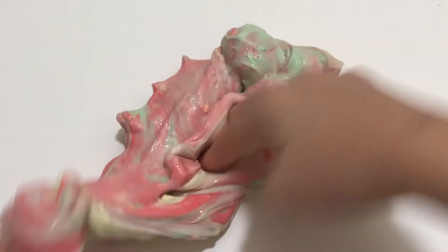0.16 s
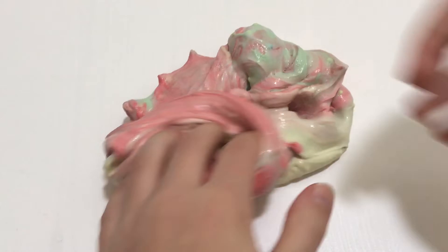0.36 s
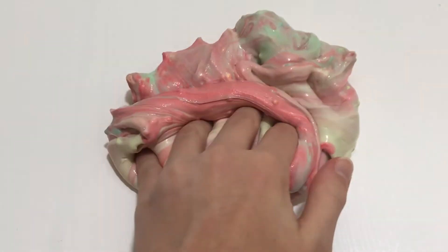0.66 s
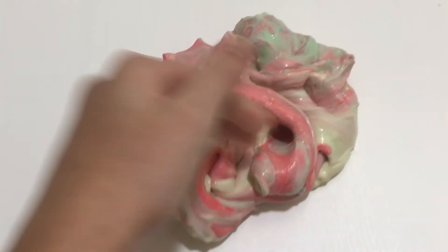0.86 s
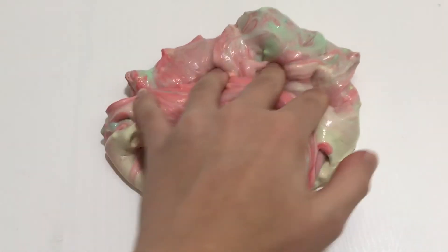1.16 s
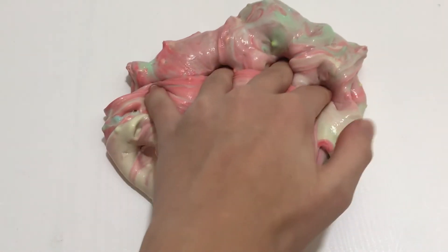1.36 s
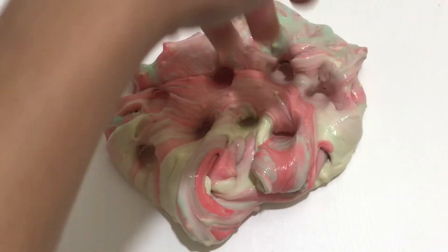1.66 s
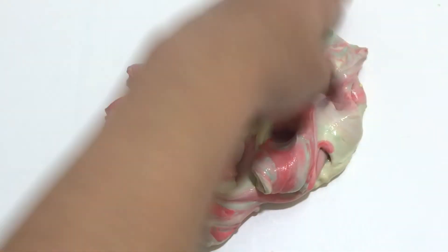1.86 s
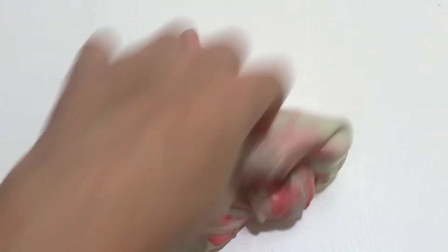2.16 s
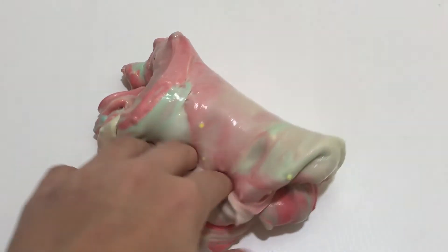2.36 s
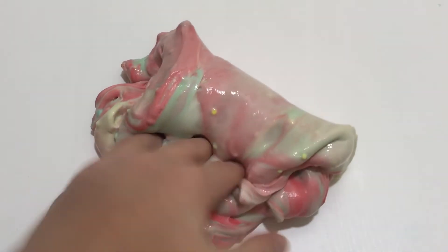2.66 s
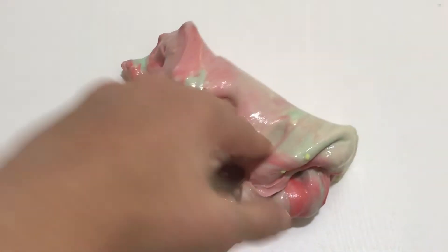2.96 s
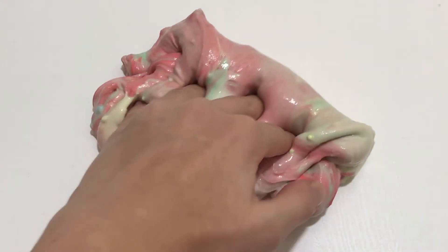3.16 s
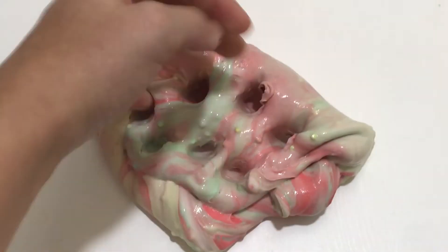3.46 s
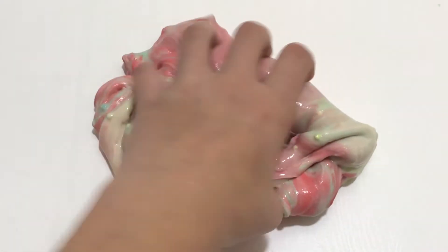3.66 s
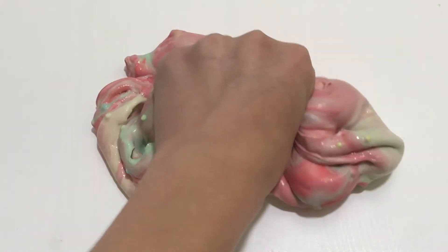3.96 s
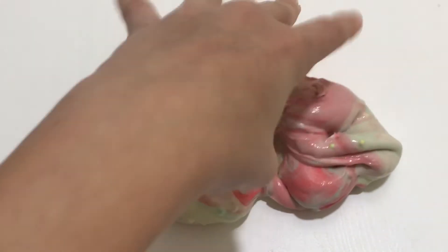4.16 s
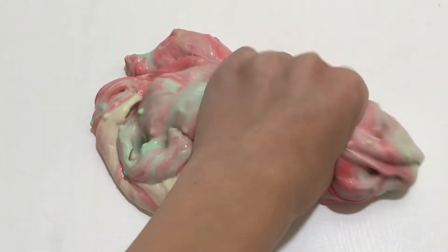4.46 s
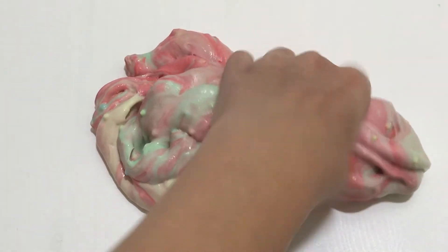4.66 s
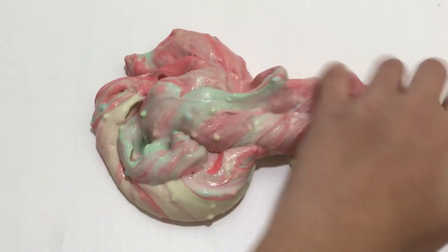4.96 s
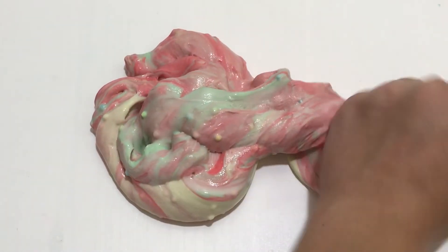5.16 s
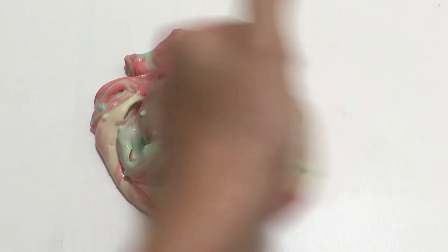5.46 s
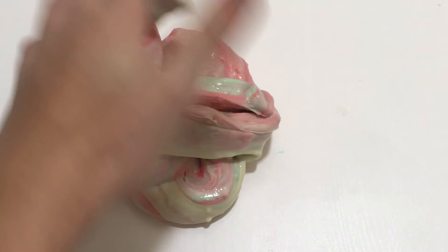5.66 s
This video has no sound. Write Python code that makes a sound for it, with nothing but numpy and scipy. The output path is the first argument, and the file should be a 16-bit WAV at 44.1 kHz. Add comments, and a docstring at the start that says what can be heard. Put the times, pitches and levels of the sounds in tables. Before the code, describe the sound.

Hands knead sticky slime on a table, with sharp air-pocket pops, wet crackling peels and soft low thumps in a small room.

```python
"""In a small room, close to a phone microphone, hands knead a lump of slime on a table.
Trapped air pockets burst as short damped swings; the sticky skin peels as many tiny random bursts.
Finger presses ring the low modes of the table top, quick slaps of the lump its higher modes.
Under it lie an unsteady low rumble, as filtered noise, and a hiss whose level steps up and down."""
import sys
import numpy as np
from scipy import signal
from scipy.fft import rfft, irfft, next_fast_len
from scipy.io import wavfile
from scipy.ndimage import uniform_filter1d, map_coordinates

SR = 44100
rng = np.random.default_rng(int(sys.argv[2]) if len(sys.argv) > 2 else 0)


def put_to_file(sound):
    """Save the sound as 16-bit audio at rate SR, in the file named by the first command-line argument."""
    columns = np.atleast_2d(sound).T  # one column per channel
    safe = np.clip(columns, -1, 1)
    whole_steps = np.round(safe * 32767)
    wavfile.write(sys.argv[1], SR, whole_steps.astype(np.int16))


N = 257103


def amp(db):
    """Level: an amplitude ratio is 10 to the power dB / 20."""
    return 10 ** (np.asarray(db) / 20)


def unit(x):
    """Normalisation: the root mean square becomes 1."""
    return x / np.sqrt(np.mean(x ** 2) + 1e-20)


def along(points, hz):
    """Logarithmic frequency scale: interpolates (f/Hz, value) points along it."""
    f, value = np.transpose(points)
    return np.interp(np.log(hz + 1), np.log(f + 1), value)


def filtered(x, response):
    """Linear filtering: the spectrum of x times a complex response of frequency."""
    size = next_fast_len(len(x) + SR // 2)
    spectrum = rfft(x, size) * response(np.fft.rfftfreq(size, 1 / SR))
    return irfft(spectrum, size)[:len(x)]


def coloured(x, spectrum):
    """Spectral shaping: x filtered by (f/Hz, gain/dB) points, then brought to unit power."""
    return unit(filtered(x, lambda hz: amp(along(spectrum, hz))))


def add(track, sound, s):
    """Superposition: mixes sound into track at s seconds."""
    part = track[round(s * SR):][:len(sound)]
    part += sound[:len(part)]


def blip(hz, cycles, size=SR // 40):
    """Damped oscillation: an air spring swings a few cycles and moves no net air; peak 1."""
    turns = np.arange(size) / SR * hz
    swell = turns * np.exp(-turns / cycles)
    swing = swell * np.sin(2 * np.pi * turns)
    # subtracting a share of the swell brings the sum to zero
    swing -= swell * swing.sum(axis=-1, keepdims=True) / swell.sum(axis=-1, keepdims=True)
    return swing / np.max(np.abs(swing), axis=-1, keepdims=True)


def modes(table):
    """Modal superposition: causal response of (f/Hz, width/Hz, level/dB) resonances."""
    def response(f):
        return sum(amp(db) * 1j * f * width / (centre * centre - f * f + 1j * f * width)
                   for centre, width, db in table)
    return response


# reverberation time of the room: f/Hz, t60/s
REVERBERATION_TIME = [(150, .35), (500, 0.19), (1200, 0.33), (3000, 0.2), (7000, 0.28), (15000, 0.14)]
# relative colour of the wall reflections: f/Hz, level/dB
WALL_COLOUR = [(200, -3), (800, -2), (2500, -2.5), (6000, -7.5), (16000, -3.5)]


def room_tail():
    """Reverberation: a fresh diffuse tail of energy 1; each frequency decays at its own rate."""
    hz, t, noise = signal.stft(rng.standard_normal(SR // 2), SR, nperseg=256)
    colour_db = along(WALL_COLOUR, hz)[:, None]
    decay_db = -60 * t / along(REVERBERATION_TIME, hz)[:, None]
    tail = signal.istft(noise * amp(colour_db + decay_db), SR, nperseg=256)[1]
    tail *= 1 - np.exp(-np.arange(len(tail)) / SR / 0.00055)  # the walls take a moment to answer
    return tail / np.linalg.norm(tail)


# relative spectrum of the house rumble: f/Hz, density/dB
RUMBLE_SPECTRUM = [(13, -36), (22, -7), (76, 0.5), (223, -14.5), (334, -15), (451, -17), (520, -33),
                   (620, -21), (837, -27), (1500, -29), (1950, -47), (3300, -120)]
RUMBLE_DB, RUMBLE_SWELL_DB, SWELL_HZ = -67, 1.8, 6  # level; scale and rate of its random swell


def rumble():
    """Modulated noise: the low rumble of the house swells and sinks at random."""
    points = rng.standard_normal(int(N * SWELL_HZ / SR) + 4)
    swell = map_coordinates(points, [np.arange(N) * SWELL_HZ / SR])
    noise = coloured(rng.standard_normal(N), RUMBLE_SPECTRUM)
    return amp(RUMBLE_DB + RUMBLE_SWELL_DB * swell) * noise


# spells of louder hiss: start t/s, end t/s, level at the start/dB
HISS_SPELLS = [(0, .25, -70), (0.256, 0.707, -62.5), (0.858, 1.39, -62.5), (1.559, 1.679, -61.5),
               (1.99, 2.255, -67), (2.77, 3.195, -62.5), (3.417, 3.622, -73), (3.78, 4.31, -69),
               (4.41, 4.935, -66), (5.039, 5.77, -67.5)]
# relative spectrum of the hiss: f/Hz, density/dB
HISS_SPECTRUM = [(290, -32), (500, -4), (570, -2), (773, -7), (946, -4.5), (1260, -8), (4210, -10),
                 (16000, -17)]
QUIET_DB, SAG_DB_PER_S = -76.5, 11  # hiss floor; how fast a spell sinks towards it
STEP_S = 0.016  # time a step of the level takes


def hiss():
    """Stationary noise under a stepped gain: microphone hiss jumps up, sags and drops back."""
    t = np.arange(N) / SR
    level_db = np.full(N, float(QUIET_DB))
    for start, end, db in HISS_SPELLS:
        sagging_db = np.maximum(db - SAG_DB_PER_S * (t - start), QUIET_DB)
        level_db = np.where((t >= start) & (t < end), sagging_db, level_db)
    level_db = uniform_filter1d(level_db, int(STEP_S * SR) + 1)
    return amp(level_db) * coloured(rng.standard_normal(N), HISS_SPECTRUM)


# presses that reach the table top: t/s, length/s, relative push level/dB
THUMPS = [(0.241, .06, -44), (0.875, .06, -43.5), (1.165, .01, -53.5), (1.566, .04, -50), (1.637, .01, -40),
          (1.942, .01, -47), (1.958, .01, -41), (2.267, .01, -61.5), (2.775, .06, -41.5), (3.426, .04, -44),
          (3.492, .01, -43), (3.699, .01, -54.5), (4.098, .13, -47), (4.454, .01, -56.5),
          (4.723, .04, -50.5), (5.037, .04, -46)]
# low modes of the table top: f/Hz, width/Hz, relative level/dB
LOW_MODES = [(68, 16, 1.5), (107.57, 23, -2), (210, 24, -4)]
FINGER_S, FINGER_SCATTER_DB = .027, 1.5  # from one finger to the next


def thumps():
    """Forced modal vibration: soft pushes, finger after finger, ring the top's low modes."""
    pushes = np.zeros(N)
    for s, length, db in THUMPS:
        luck = rng.standard_normal(8)
        lags = np.arange(0, length, FINGER_S)[:len(luck)]
        for finger, lag in enumerate(lags):
            push_db = db + FINGER_SCATTER_DB * luck[finger]
            add(pushes, amp(push_db) * blip(71, cycles=0.17), s + lag)
    return amp(9.5) * filtered(pushes, modes(LOW_MODES))


# slaps of the lump that knock the table top: t/s, relative blow level/dB
KNOCKS = [(.2553, -40), (.296, -37.5), (0.8761, -28), (.89, -30.5), (.9209, -36), (1.5803, -54.5),
          (1.629, -47), (2.7727, -33.5), (2.7888, -29.5), (3.437, -45), (4.1033, -45), (5.0416, -27.5),
          (5.0565, -32.5)]
# higher modes of the table top: f/Hz, width/Hz, relative level/dB
HIGH_MODES = [(270, 180, -7), (401, 17, -1.5), (593, 18, -6.5), (618, 30, 2), (719, 18, 3.5)]


def knocks():
    """Impact excitation: a quick slap rings the top's higher modes, and the room answers."""
    blows = np.zeros(N)
    for s, db in KNOCKS:
        add(blows, amp(db) * blip(500, cycles=0.39), s)
    ringing = amp(8.5) * filtered(blows, modes(HIGH_MODES))
    return ringing + amp(2.0) * signal.fftconvolve(ringing, room_tail())[:N]


def bubbles(count, centre_hz, spread, cycles, scatter_db, size):
    """Random superposition: tiny pockets burst at chance times, pitches and sizes."""
    at, pitch, luck = rng.random((count, 3)).T
    hz = centre_hz * np.exp(spread * (2 * pitch[:, None] - 1))
    shapes = blip(hz, cycles, size) * amp(-scatter_db * np.log(luck))[:, None]
    index = (at * N).astype(int)[:, None] + np.arange(shapes.shape[1])
    bursts = unit(np.bincount(index.ravel(), shapes.ravel(), N)[:N])
    return bursts + 0.84 * rng.standard_normal(N)  # noise stands for a bed of finer pockets


SLOPE_DB = 32  # what a rise or a fall spans


def stroke(s, rise, hold, fall):
    """Exponential envelope: a gain that climbs, holds at 1 and sinks, straight in dB."""
    t = np.arange(N) / SR - s
    slope = np.minimum(t / abs(rise), (hold - t) / abs(fall))
    return amp(SLOPE_DB * np.minimum(0, slope))


# skin peeling off the fingers, and at 5.047 and 5.377 s the noisy wash around a pop:
# t at full level/s, rise/s, hold/s, fall/s, relative crackle level/dB, squelch level re crackle/dB
PEELS = [(0.245, 0.044, 0.0063, 0.0056, -47, 9.5), (0.855, 0.015, 0.022, .004, -45, -2),
         (1.58, .03, 0.04, 0.15, -56, 8), (1.996, 0.022, 0.02, .12, -45, -7.5),
         (2.771, 0.0039, 0.017, 0.11, -31.5, 0.5), (3.418, 0.0025, 0.0073, 0.13, -34, 0.5),
         (3.813, 0.082, 0.21, 0.035, -65.5, 3.3), (4.096, 0.083, 0.09, 0.14, -43, -2),
         (4.614, 0.27, .003, 0.13, -52, -25), (4.72, 0.036, 0.031, 0.19, -42.5, 1),
         (5.047, 0.0035, 0.029, 0.082, -41, -0.5), (5.377, 0.01, 0.0276, 0.127, -42, -15),
         (5.609, 0.095, 0.062, 0.098, -50, -10.5)]
# colour of the fine crackle: f/Hz, relative gain/dB
CRACKLE_COLOUR = [(710, -30), (1200, -3.5), (1700, -9.5), (2000, -8.5), (4600, -5.5), (10500, -7.5),
                  (15200, -5), (16000, -19.5)]
# colour of the wet squelch: f/Hz, relative gain/dB
SQUELCH_COLOUR = [(120, -17), (250, -1.5), (600, -11), (1000, 0.5), (1800, 1), (3000, -23)]


def peeling():
    """Crackling noise: parting slime threads, or the wash of a pop; fine crackle, wet squelch."""
    fine = bubbles(count=7000, centre_hz=4610, spread=0.86, cycles=1.7, scatter_db=0.0, size=160)
    wet = bubbles(count=1800, centre_hz=865, spread=1.05, cycles=2.9, scatter_db=4.5, size=700)
    crackle_gain = sum(amp(db) * stroke(*shape) for *shape, db, _ in PEELS)
    squelch_gain = sum(amp(db + wet_db) * stroke(*shape) for *shape, db, wet_db in PEELS)
    crackle = crackle_gain * coloured(fine, CRACKLE_COLOUR)
    squelch = squelch_gain * coloured(wet, SQUELCH_COLOUR)
    near = amp(-7.5) * (crackle + squelch)
    return near + amp(-7) * signal.fftconvolve(near, room_tail())[:N]


# bursting air pockets: t/s, snap level/dB, snap f/Hz,
# fizz level re snap/dB, hollow level re snap/dB
POPS = [ (.152, -52, 8000, -6, -30), (.1972, -42.5, 6200, -10, -36), (.219, -45, 5960, -13, -25),
        (0.2241, -38, 6150, -5, -19), (0.255, -6, 6200, -8, -14.5), (0.2884, -5.5, 6600, -1, -36),
        (0.289, -5, 5700, -11, -33), (0.2917, -5, 6380, -7, -21.5), (0.5242, -38, 5960, -17, -36),
        (0.606, -51.5, 6870, 4.5, -30), (0.8583, -27.5, 4000, -17, -26.5),
        (0.8758, -15.5, 2840, -14, -19.5), (.89, -5, 6460, -17, -13), (0.9211, -7, 5360, -10, -14.5),
        (1.2594, -46, 4400, 5, -6.5), (1.3331, -34, 5870, -18.5, -29.5), (1.5649, -43, 4250, 6, 0.2),
        (1.5807, -31.5, 6060, -11.5, -26.5), (1.603, -38.5, 3610, 2.5, -24), (1.628, -42, 3700, 9, -12),
        (2.0017, -41, 8800, -11.5, -15), (2.027, -32.5, 3410, -25, -20), (2.6701, -50, 2180, 5, -25),
        (2.7493, -42, 9000, -8, -33.5), (2.773, -13, 5450, 10, -24.5), (2.7887, -9, 5000, 0.5, -18.5),
        (3.0506, -56, 2894, 18.5, -22.5), (3.418, -24, 6000, 5, -18), (3.434, -24.5, 3980, -4, -18.5),
        (3.447, -31, 3000, -12.5, -25), (3.479, -31, 2880, -13, -27), (3.7517, -52.5, 3500, -10, -14),
        (3.803, -48, 8700, -16, -9.5), (3.841, -49, 3470, -5, -9), (3.8703, -28.5, 8740, -1, -25),
        (3.933, -40.5, 3020, 1, -23), (4.0608, -48, 7120, 5, -11), (4.1044, -28.5, 5000, -13, -26),
        (4.187, -29, 6200, 0, -32), (4.1902, -33, 5920, -3, -24.5), (4.398, -53.5, 7000, -1.5, -26),
        (4.4176, -45, 5670, -5, -20), (4.4596, -43, 3630, -10, -13), (4.474, -26.5, 8600, -3, -17),
        (4.524, -26, 3540, 0, -30), (4.587, -34.5, 3060, 10, -10), (4.5888, -39, 1930, 13.5, -12.5),
        (4.651, -48, 8800, 17.5, -30), (4.706, -41.5, 2360, 2.5, -16), (4.8474, -40.5, 2450, -16.5, -10),
        (5.0418, -29.5, 5300, -11.5, 4), (5.204, -49.5, 9330, 3, -37.5), (5.2392, -38.5, 3260, 5, 4.5),
        (5.2708, -46.5, 3000, 11, 4.5), (5.378, -13, 7900, 1.5, -26.5), (5.6172, -44.5, 5000, -14.5, -4),
        (5.6523, -37.5, 5730, 7.5, -18)]
HOLLOW_HZ, HOLLOW_SPREAD = 1050, .1  # pitch of an emptied pocket, its scatter in log frequency
POP_ROOM_DB = -4.5  # room tail re the near sound


def pop_burst(snap_hz, fizz_db, hollow_db):
    """Sudden pressure release: the film snaps and flutters, the emptied pocket rings lower."""
    hollow_hz = HOLLOW_HZ * np.exp(HOLLOW_SPREAD * rng.standard_normal())
    burst = blip(snap_hz, cycles=0.32) - amp(fizz_db) * blip(13000, cycles=0.26)
    burst += amp(-22.0) * blip(snap_hz, cycles=1.9)  # the torn film flutters a little longer
    add(burst, amp(hollow_db) * blip(hollow_hz, cycles=0.6), .0003)
    return burst


def near_scatter():
    """Early reflection: fingers, folds and table top close by scatter sound for some milliseconds."""
    t = np.arange(SR // 50) / SR
    scatter = rng.standard_normal(len(t)) * amp(-60 * t / 0.018) * (t > .0003)
    return scatter / np.linalg.norm(scatter)


def pops():
    """Direct sound and reflections: each burst, its near scatter, then the room's answer."""
    out = np.zeros(N)
    for s, db, snap_hz, fizz_db, hollow_db in POPS:
        burst = amp(db) * pop_burst(snap_hz, fizz_db, hollow_db)
        near = amp(-1.5) * signal.fftconvolve(burst, near_scatter())
        add(near, burst, 0)
        add(out, near, s)
        add(out, amp(POP_ROOM_DB) * signal.fftconvolve(near, room_tail()), s)
    return out


def scene():
    """Superposition: the sources add linearly at one microphone."""
    return (rumble() + hiss() + thumps() + knocks() + peeling() + pops())[None]


# overall colour of the sound: f/Hz, gain/dB; it falls steeply above 16 kHz
OVERALL_COLOUR = [(20, -17.5), (50, -0.5), (9800, 0.5), (10500, -5), (11300, 2), (15800, 0.5), (16100, -28)]
OVERLOAD, TOP_HZ = .8, 16960  # amplitude where soft limiting sets in (full scale 1); band limit


def record(dry):
    """Transduction: overall colour, soft overload of the loudest sounds, then a band limit."""
    heard = filtered(dry[0], lambda hz: amp(along(OVERALL_COLOUR, hz)))
    heard = heard / (1 + np.abs(heard / OVERLOAD) ** 4) ** (1 / 4)
    return filtered(heard, lambda hz: hz < TOP_HZ)[None]


dry = scene()
out = record(dry)
put_to_file(out)
```